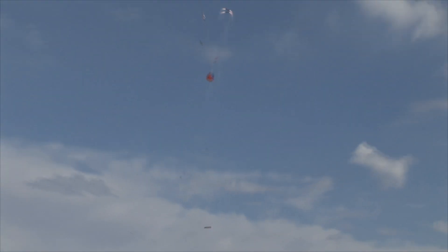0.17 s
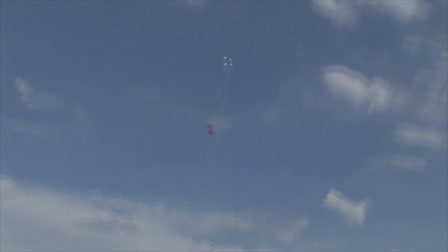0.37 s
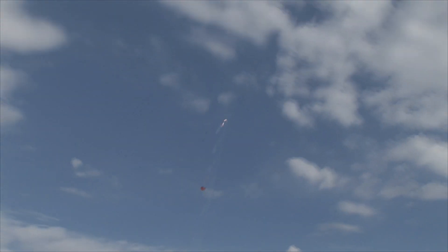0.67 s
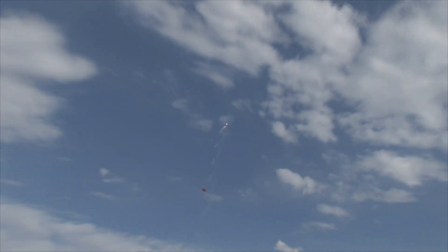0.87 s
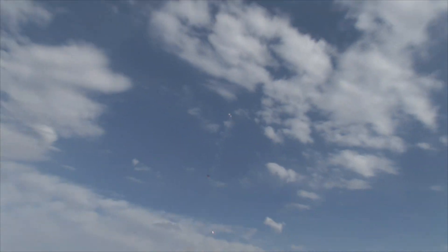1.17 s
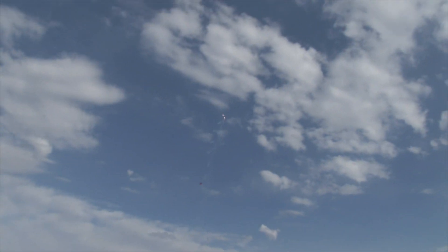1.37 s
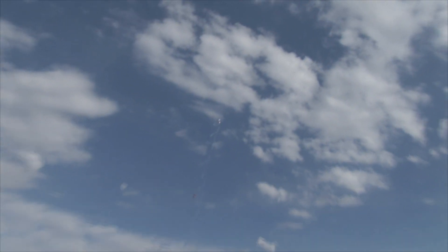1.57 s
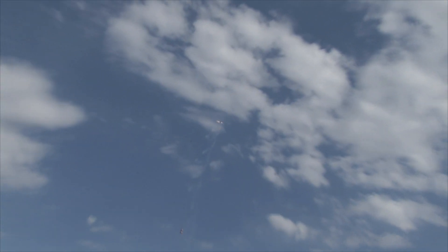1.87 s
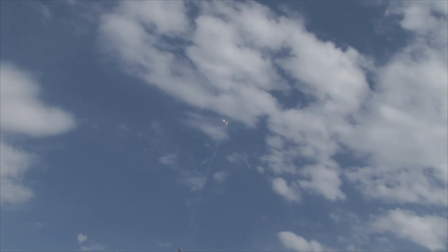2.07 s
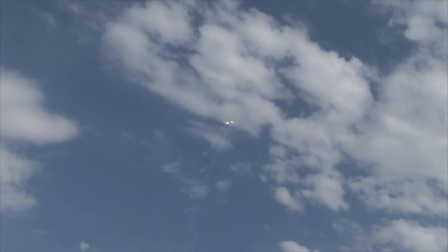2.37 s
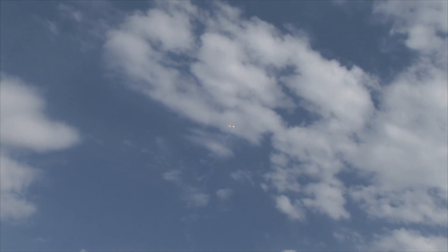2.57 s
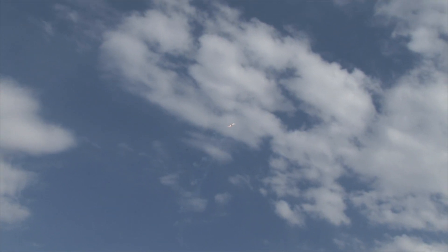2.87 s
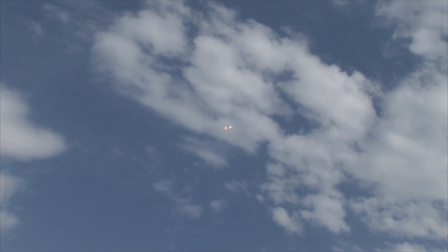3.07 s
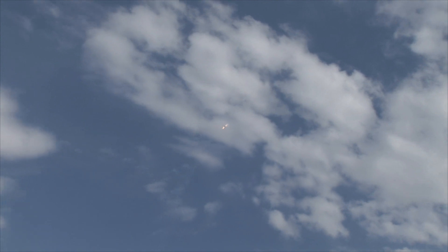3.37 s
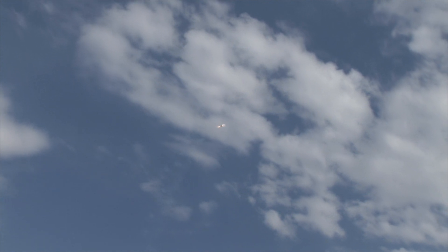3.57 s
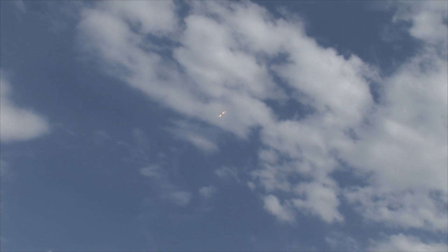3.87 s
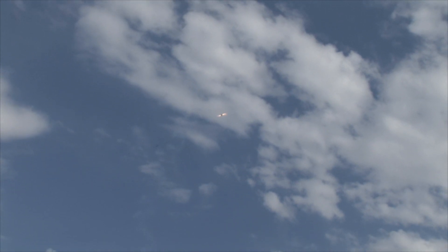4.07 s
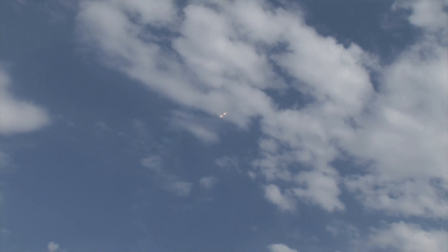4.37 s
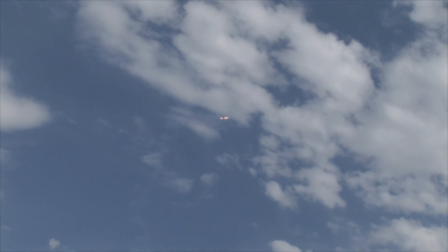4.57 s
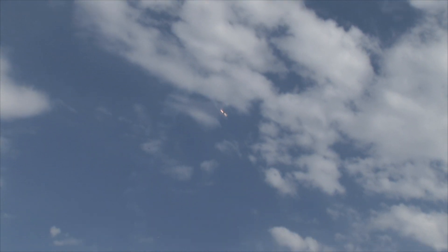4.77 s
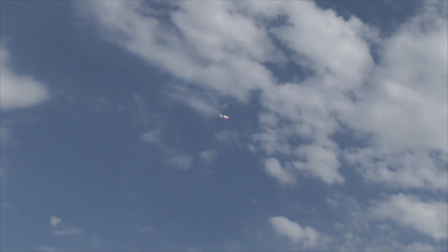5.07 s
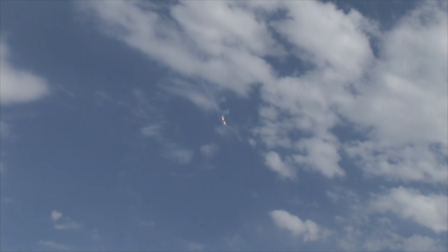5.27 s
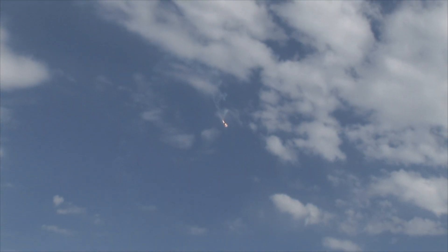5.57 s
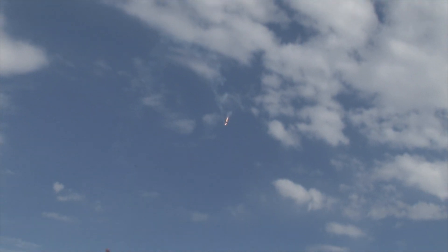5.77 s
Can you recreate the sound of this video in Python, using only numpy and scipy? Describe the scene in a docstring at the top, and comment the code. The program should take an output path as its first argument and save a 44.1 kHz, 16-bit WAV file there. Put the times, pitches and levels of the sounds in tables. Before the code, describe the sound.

Fast chuffing bursts merge into a far-off, unsteady rocket roar with throaty surges, sharp crackling pops and a slowly gliding hollow coloration.

```python
"""Rocket over a desert flat

A motor burns high and far off: shaped noise and hiss bursts chuff, catch, then roar and crackle as it tumbles.
The ground echo trails the direct sound by a changing delay, so a comb sweeps through the roar.
Flare-ups lift the noise; throaty surges, a deep drone and N-shaped shock pops join it.
Two microphones on the flat also take in low rumble noise, a few faint close noise ticks and steady hiss."""
import sys
import numpy as np
from scipy import signal
from scipy.fft import rfft, irfft, next_fast_len
from scipy.io import wavfile
from scipy.ndimage import uniform_filter1d, map_coordinates

SR = 44100
rng = np.random.default_rng(int(sys.argv[2]) if len(sys.argv) > 2 else 0)


def log_audio(samples):
    """Write samples as a 16-bit WAV file to the path given in sys.argv[1]."""
    # one column per channel
    frames = np.atleast_2d(samples).T
    # limit to full scale, then quantise
    limited = np.clip(frames, -1, 1)
    pcm = np.round(limited * 32767).astype(np.int16)
    wavfile.write(sys.argv[1], SR, pcm)


N = 261513
TIME = np.arange(N) / SR  # [s]
SIZE = next_fast_len(N, True)
HZ = np.fft.rfftfreq(SIZE, 1 / SR)


def amp(db):
    """Decibels to gain."""
    return 10 ** (np.asarray(db) / 20)


def unit(x):
    """Scales to rms 1."""
    return x / np.sqrt(np.mean(x ** 2) + 1e-20)


def over_hz(points, hz=HZ):
    """Joins (frequency, value) points on a log-frequency axis."""
    f, value = np.transpose(points)
    return np.interp(np.log(hz + 1e-9), np.log(f), value)


def over_time(rows):
    """Joins (time, value) points into a curve over the whole scene."""
    s, value = np.transpose(rows)
    return np.interp(TIME, s, value)


def filtered(x, gain):
    """Applies a gain for each frequency."""
    return irfft(rfft(x, SIZE) * gain, SIZE)[..., :N]


def below(hz, order=8):
    """Gain of a smooth low-pass."""
    return 1 / (1 + (HZ / hz) ** order)


def coloured_noise(colour, shape=N):
    """White noise given a spectrum from a colour table."""
    return filtered(rng.standard_normal(shape), amp(over_hz(colour)))


def wander(rate_hz, slowest_hz=6):
    """Slow chance of rms 1, between the two rates."""
    band = below(rate_hz, order=4) * (1 - below(slowest_hz, order=4))
    return unit(filtered(rng.standard_normal(N), band))


def shocks(per_s, spread_db):
    """A random train of one-sample pressure spikes; spread_db sets how unequal they are."""
    size = amp(spread_db * np.minimum(rng.exponential(1, N), 4))
    return unit(size * (rng.random(N) < per_s / SR))


USUAL_DB = -33  # reference level from which the jet's swing is counted
# slow swell of the jet as the tumbling nozzle swings: (time [s], level [dB])
JET_SWELL = [(.22, -36.5), (.33, -43.5), (.39, -38.5), (.82, -34), (1.15, -36.5), (1.36, -36),
             (1.64, -32.5), (2.24, -37), (2.32, -34), (2.55, -36.5), (2.72, -28.5), (2.86, -36), (3, -33),
             (3.06, -29.5), (3.21, -30), (3.245, -37.5), (3.58, -32), (3.72, -39.5), (3.89, -38.5),
             (4.18, -36.5), (4.36, -32), (4.6, -30.5), (4.69, -35.5), (5.12, -28), (5.18, -37), (5.3, -33),
             (5.76, -40), (5.82, -31.5), (5.93, -32.5)]
# dulling as the nozzle turns away, added to the body, taken from the edge: (time [s], change [dB])
NOZZLE_DULLNESS = [(.2, -3), (1.5, -0.5), (2.7, 0.1), (3, -0.5), (3.3, 3), (3.85, 0.5), (4.1, -0.5),
                   (5.05, -1.5), (5.55, -0.5), (5.7, 1), (5.93, -2)]
# jet noise after a long way through air: (frequency [Hz], density [dB per Hz])
FAR_JET_COLOUR = [(80, -8.5), (190, -5), (480, 2), (820, -1), (1000, -3.5), (1220, -2.5), (1500, -10),
                  (1850, -11), (2200, -8), (2900, -11.5), (3300, -17.5), (4000, -22.5), (4750, -40.5),
                  (5150, -36.5), (7000, -67)]


def jet(crackle=0.77, flare_crackle=0.064, flutter_db=0.66,
        body_db=0.28, rush_db=-3, edge_db=-14.0,
        body_flutter_db=0.66, edge_flutter_db=1.1, body_follow=0.43, edge_follow=1.15):
    """Turbulence and small shocks; the higher the band, the more the swinging nozzle beams it."""
    swing = over_time(JET_SWELL) - USUAL_DB
    dull = over_time(NOZZLE_DULLNESS)
    rise, sharp = flares()
    drive = unit(rng.standard_normal(N) + crackle * shocks(per_s=700, spread_db=0))
    drive = drive * amp(flutter_db * wander(41))  # large eddies shake all bands together
    drive += flare_crackle * rise * shocks(per_s=300, spread_db=0)  # flare-ups are more ragged

    # three bands: body, rush, edge
    colour = amp(over_hz(FAR_JET_COLOUR))
    low, high = below(892), 1 - below(2733, order=16)
    body_level = body_db + body_follow * swing + dull + body_flutter_db * wander(35)
    edge_level = edge_db + edge_follow * swing - dull + sharp + edge_flutter_db * wander(6)
    body = amp(body_level) * unit(filtered(drive, colour * low))
    rush = amp(rush_db + swing) * unit(filtered(drive, colour * (1 - low - high)))
    edge = amp(edge_level) * unit(filtered(drive, colour * high))
    return amp(USUAL_DB + rise) * (body + rush + edge)


FLARE_RISE_S, FLARE_FALL_S = 0.0091, 0.0048  # time constants
# brief flare-ups of the flame:
# (start time [s], held length [s], level rise [dB], extra sharpness of the edge [dB])
FLARE_UPS = [(0.603, .055, 2, 3.5), (1.009, .08, 4.5, 2), (1.2, 0.061, 5, 0), (1.811, 0.033, 2.5, 4.5),
             (2.079, 0.075, 4.5, -1.5), (2.452, 0.043, 6, -0.5), (3.434, 0.01, 2.5, 9.5),
             (3.477, 0.0052, 4.5, 13.5), (3.507, 0.032, -3, -2), (3.779, 0.045, 5.5, -3),
             (3.921, 0.03, 9.5, -6.5), (3.957, 0.088, 6.5, 5), (4.094, .05, 3.5, 4.5), (4.741, 0.036, 1, 5),
             (5.057, 0.052, -1, 1.5)]


def flares():
    """Each flare-up rises, holds and falls; gives the added level and the added sharpness in dB."""
    rise, sharp = np.zeros(N), np.zeros(N)
    for start, length, rise_db, sharp_db in FLARE_UPS:
        before = (start - TIME) / FLARE_RISE_S
        after = (TIME - start - length) / FLARE_FALL_S
        shape = np.exp(-np.maximum(np.maximum(before, after), 0))
        rise += rise_db * shape
        sharp += sharp_db * shape
    return rise, sharp


# coughs as the motor lights: (time [s], hiss level [dB])
COUGHS = [(.0165, -17.5), (0.0407, -21.5), (0.0613, -18), (0.084, -19), (0.105, -20.5), (0.129, -23),
          (0.152, -19.5), (.178, -22), (0.19, -30.5)]
# hiss of a cough, and of the rattle round a pop: (frequency [Hz], density [dB per Hz])
COUGH_COLOUR = [(60, -18), (350, 0), (650, -1), (900, -14.5), (1200, -9), (1600, -12.5), (2400, -7),
                (3200, -10.5), (4000, -17), (4700, -33), (5600, -35), (7500, -63), (12000, -65)]
# each cough cracks open; as the flame takes hold, they die more slowly and push less
COUGH_RISE_S, COUGH_FALL_S, FALL_GROWTH_S_PER_S = 0.0023, 0.0048, 0.034
PUSH_DB, PUSH_FALL_DB_PER_S = -8, 99  # push at time zero and its weakening


def chuffs(push_s=0.0026, swing=1.3, turn=0.1, linger=0.51):
    """Each cough is a crack of hiss on a low swing of pressure: chiefly down, then up."""
    hiss_level, push = np.zeros(N), np.zeros(N)
    for s, hiss_db in COUGHS:
        near = abs(TIME - s) < .05
        t = TIME[near] - s
        u = t / push_s
        length = np.where(t < 0, COUGH_RISE_S, COUGH_FALL_S + FALL_GROWTH_S_PER_S * s)
        hiss_level[near] += amp(hiss_db) * np.exp(-.5 * (t / length) ** 2)
        push_gain = amp(PUSH_DB - PUSH_FALL_DB_PER_S * s)
        push[near] -= push_gain * np.cos(swing * u + turn) / np.cosh(u - linger)
    return hiss_level * unit(coloured_noise(COUGH_COLOUR)) + push


# shock pops, the longest of them dull thuds: (time [s], peak before rounding [dB], length [s])
SHOCK_POPS = [(1.35, -25, 0.018), (2.318, -22.5, .0008), (2.422, -35.5, .0018), (2.478, -26.5, 0.0012),
              (2.483, -19.5, .0011), (2.508, -25, 0.0032), (2.856, -26.5, 0.011), (3.341, -17.5, .0015),
              (3.447, -13, .0031), (3.486, -20, 0.0026), (3.52, -13.5, 0.0013), (3.549, -12, 0.0019),
              (3.928, -15, 0.0028), (3.943, -16.5, 0.0036), (4.023, -19, .0011), (4.254, -22.5, 0.0074),
              (4.423, -21.5, 0.0078)]


def pops(air_hz=3600, rattle_db=-14, rattle_s=0.011):
    """N-shaped shock waves, rounded by the air, each inside a short rattle of scattered sound."""
    waves, rattle = np.zeros(N), np.zeros(N)
    for s, db, length in SHOCK_POPS:
        u = 2 * (TIME - s) / length
        waves -= amp(db) * u * (abs(u) < 1)
        rattle += amp(db) * np.exp(-abs(TIME - s) / rattle_s)
    scattered = unit(coloured_noise(COUGH_COLOUR))
    return filtered(waves, below(air_hz, order=12)) + amp(rattle_db) * rattle * scattered


# throaty surges of the flame, bell-shaped in time:
# (time [s], level before the common lift [dB], standard deviation [s], centre frequency [Hz])
FLAME_SURGES = [(1.581, -28.5, .09, 290), (1.72, -28.5, .05, 326), (1.835, -29.5, 0.035, 323),
                (2.405, -31, .034, 253), (2.495, -27, .031, 286), (2.584, -28.5, 0.018, 256),
                (2.868, -25.5, .032, 270), (3.118, -35.5, 0.06, 495), (3.403, -26.5, .012, 350),
                (3.465, -24.5, 0.02, 456), (3.519, -23.5, 0.0092, 485), (3.554, -25, 0.0054, 547),
                (3.934, -23, .015, 365), (4.025, -34.5, .0064, 301)]
# colour of a surge: (multiple of its centre frequency [ratio], density [dB per Hz])
FLAME_SURGE_COLOUR = [(.3, -14), (.7, -7.5), (1, 1), (1.4, -3.5), (2.1, -8), (3, -19.5), (4, -13),
                      (5.5, -26.5), (9, -31), (16, -78.5)]


def surges(lift_db=2, lumpy_db=1.5):
    """Swells of low, lumpy combustion noise, each around its own pitch."""
    out = np.zeros(N)
    noise_hz = np.fft.rfftfreq(SR, 1 / SR)
    for s, db, length, centre_hz in FLAME_SURGES:
        near = abs(TIME - s) < 4 * length
        t = TIME[near] - s
        colour = amp(over_hz(FLAME_SURGE_COLOUR, noise_hz / centre_hz))
        noise = unit(irfft(rfft(rng.standard_normal(SR)) * colour))
        out[near] += amp(db) * np.exp(-.5 * (t / length) ** 2) * noise[:len(t)]
    return out * amp(lift_db + lumpy_db * wander(70))


# deep drone of the wide, slow end of the plume: (time [s], level [dB])
PLUME_DRONE = [(.2, -52), (1.6, -56), (2.1, -41.5), (3.1, -38), (5.4, -36), (5.93, -30.5)]


def drone(centre_hz=185, width_hz=135, top_hz=290):
    """The largest eddies of the plume hum in one broad low resonance."""
    detune = (HZ ** 2 - centre_hz ** 2) / (width_hz * (HZ + 1))
    resonance = below(top_hz) / (1 + detune ** 2)
    return amp(over_time(PLUME_DRONE)) * unit(filtered(rng.standard_normal(N), resonance))


# the rocket flies an arc; the ground echo lags most at its top
APEX_S, APEX_LAG_S, LAG_BEND_S_PER_S2 = 3.988, 0.001934, .000086
# strength of the ground echo, before its overall level: (frequency [Hz], gain [dB])
ECHO_GAIN = [(300, -1.5), (900, -3.5), (1500, -2.5), (2400, -8), (3100, -5.5), (4000, -6.5), (5000, -12)]
# porous ground shifts the phase of its echo: (frequency [Hz], phase [radians])
ECHO_PHASE = [(100, 4.5), (320, 0.44), (600, 1.2), (950, 0.6), (1300, 0.83), (1800, -0.67), (2400, 1)]


def ground(x, early_db=-1.5, late_db=-2):
    """Adds the echo off the flat; its lag follows the arc of the flight, so the notches glide."""
    lag = (APEX_LAG_S - LAG_BEND_S_PER_S2 * (TIME - APEX_S) ** 2) * SR  # [samples]
    bounced = filtered(x, amp(over_hz(ECHO_GAIN)) * np.exp(1j * over_hz(ECHO_PHASE)))
    echo = map_coordinates(bounced, [np.arange(N) - lag], order=3)
    return x + amp(np.interp(TIME, [1.4, 2.8], [early_db, late_db])) * echo


def restless_air(x, patchy_db=0.92, span_s=.06, span_hz=220):
    """Warm air over the flat focuses and thins the sound in drifting patches of time and pitch."""
    hz, t, z = signal.stft(x, SR, nperseg=1024)
    patches = rng.standard_normal((len(t), len(hz)))
    for axis, size in enumerate([span_s / t[1], span_hz / hz[1]]):
        patches = uniform_filter1d(patches, max(1, round(size)), axis)
    gain = amp(patchy_db * unit(patches).T)
    return signal.istft(z * gain, SR)[1][:N]


def scatter(x, t60=0.51):
    """Scrub and uneven ground return a short, faint haze, different on each side."""
    t = TIME[:SR // 4]  # the tail is cut at a quarter second
    tail = rng.standard_normal((2, len(t))) * amp(-60 * t / t60)
    return signal.oaconvolve(x[None], tail / np.linalg.norm(tail[0]), axes=1)[:, :N]


# left side against the right: (frequency [Hz], gain [dB])
LEFT_SIDE_GAIN = [(40, -8.5), (110, -4), (200, -7.5), (400, -14), (700, -11.5), (950, -2), (1200, -3),
                  (1550, 0.5), (1900, -1.5), (2600, -0.5), (4000, -2.5), (8000, -25)]
# left side against the right: (frequency [Hz], phase [radians])
LEFT_SIDE_PHASE = [(70, .2), (130, -.4), (330, -1.3), (520, -3.4), (700, -4.4), (950, -4.5), (1250, -5.2),
                   (1500, -5.2), (1800, -5.6), (2100, -5.55), (2700, -6.05), (4300, -6.45)]


def left_side_colour(x):
    """On the left side the low mids come weaker and later than on the right."""
    left_response = amp(over_hz(LEFT_SIDE_GAIN)) * np.exp(1j * over_hz(LEFT_SIDE_PHASE))
    return np.array([filtered(x, left_response), x])


# low rumble: (frequency [Hz], density [dB per Hz])
LOW_RUMBLE_COLOUR = [(10, -13.5), (28, -6), (44, 0.5), (56, 1.5), (80, -0.5), (140, -7), (220, -9),
                     (500, -32), (2000, -86)]


def rumble(apart=0.73, level_db=-37.5, left_db=3.5, loudest_s=2.05, fade_db_per_s=1.08,
           flare_follow=0.21, gust_db=1.13):
    """Low, gusty noise that swells once, follows the flare-ups and differs partly at each microphone."""
    shared, left, right = coloured_noise(LOW_RUMBLE_COLOUR, (3, N))
    pair = left_side_colour(shared) + apart * np.array([left, right])
    pair = amp([[left_db], [0]]) * pair
    rise, _ = flares()
    level = level_db - fade_db_per_s * abs(TIME - loudest_s) + flare_follow * rise
    return amp(level + gust_db * wander(5, slowest_hz=1.9)) * unit(pair)


# faint ticks close by: (time [s], level on the right [dB])
CLOSE_TICKS = [(0.2703, -39.5), (.316, -46), (0.37, -40), (.374, -44), (.664, -39.5), (0.797, -43),
               (.811, -42), (1.039, -41)]
# colour of the ticks: (frequency [Hz], density [dB per Hz])
CLOSE_TICK_COLOUR = [(1000, -10), (4800, 10.5), (7000, -12), (10000, -11), (15000, -11)]


def ticks(decay_s=0.0025, rise_s=0.00059, left_db=-2):
    """Tiny dry clicks close to the microphones: noise that rises and dies within milliseconds."""
    strength = np.zeros(N)
    for s, db in CLOSE_TICKS:
        strength += amp(db) * np.exp(-np.maximum((TIME - s) / decay_s, (s - TIME) / rise_s))
    grain = unit(coloured_noise(CLOSE_TICK_COLOUR, (2, N)))
    return amp([[left_db], [0]]) * strength * grain


# faint steady hiss: (frequency [Hz], density [dB per Hz])
STEADY_HISS_COLOUR = [(300, 10.5), (1500, 8), (3500, 16.5), (5200, 12), (7000, 3.5), (14000, 1.5),
                      (15000, -13.5)]


def hiss(level_db=-68):
    """Still air and microphone noise, unrelated on the two sides."""
    return amp(level_db) * unit(coloured_noise(STEADY_HISS_COLOUR, (2, N)))


def scene(scatter_db=-21, unlit_db=-7):
    """The motor with its ground echo and a little diffuse scatter, over rumble, ticks and faint hiss."""
    # the steady flame builds between the first coughs
    roar = jet() * amp(np.interp(TIME, [.06, .16], [unlit_db, 0]))
    motor = restless_air(ground(roar) + drone() + surges()) + pops() + chuffs()
    background = rumble() + ticks() + hiss()
    return left_side_colour(motor) + amp(scatter_db) * scatter(roar) + background


def record(dry, edge_hz=15000):
    """The recorder's band limit: a steep low-pass."""
    low_pass = signal.firwin(511, edge_hz, window=("kaiser", 9), fs=SR)
    return signal.oaconvolve(dry, low_pass[None], "same")


dry = scene()
out = record(dry)
log_audio(out)
```